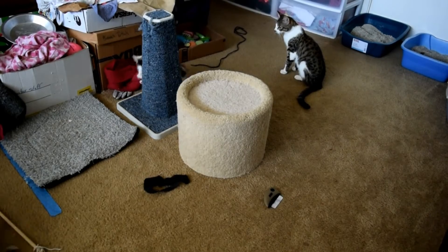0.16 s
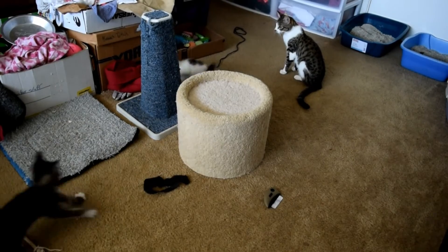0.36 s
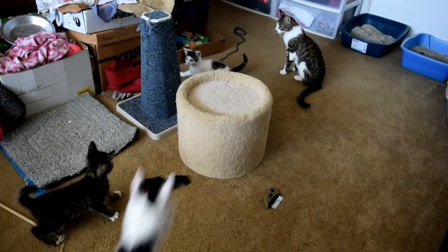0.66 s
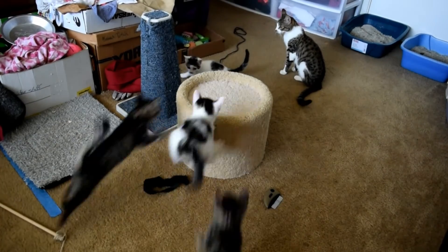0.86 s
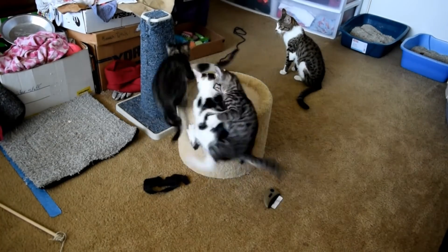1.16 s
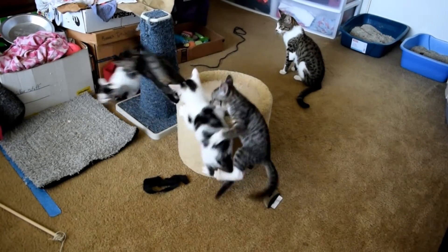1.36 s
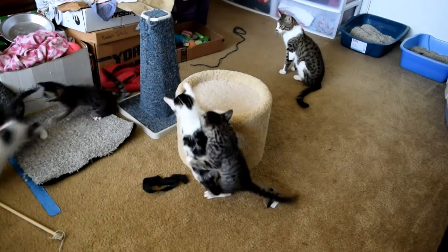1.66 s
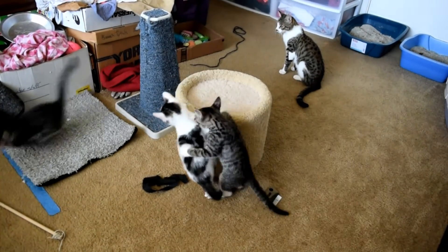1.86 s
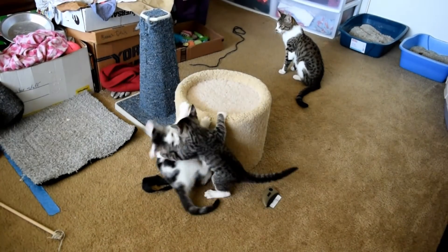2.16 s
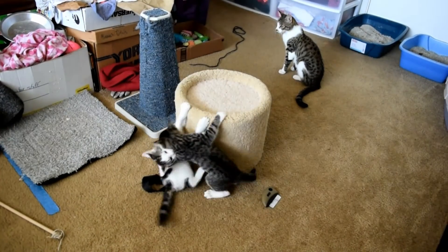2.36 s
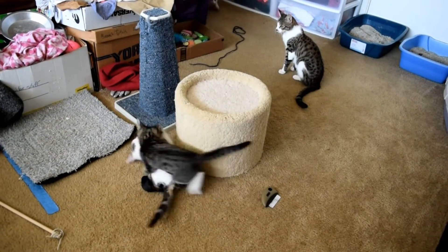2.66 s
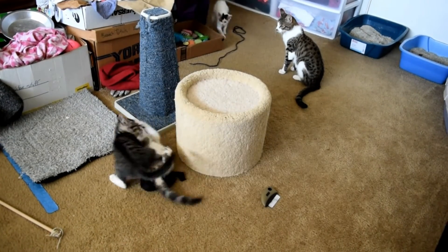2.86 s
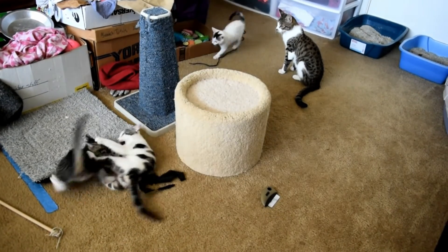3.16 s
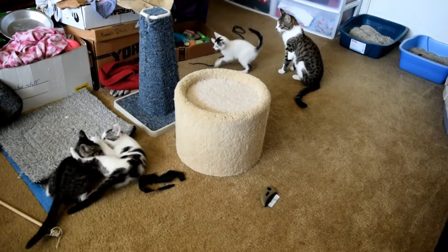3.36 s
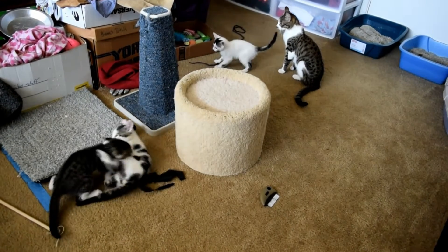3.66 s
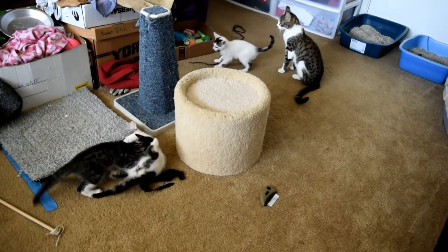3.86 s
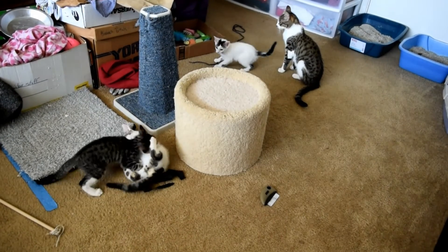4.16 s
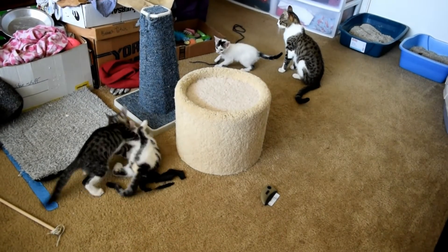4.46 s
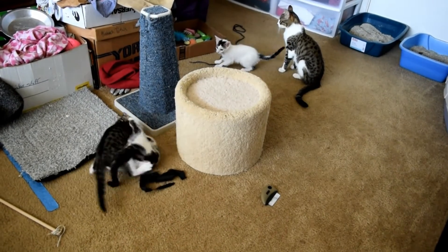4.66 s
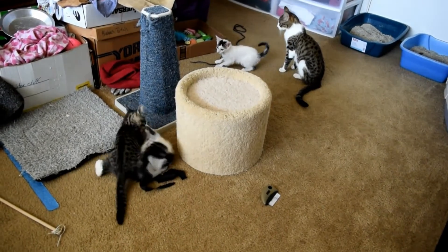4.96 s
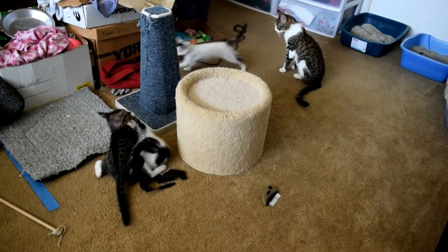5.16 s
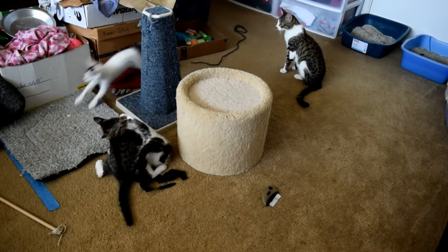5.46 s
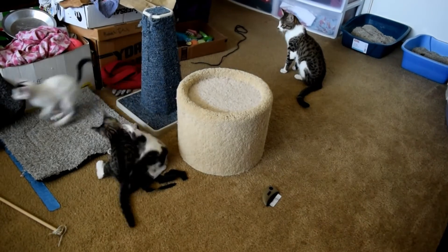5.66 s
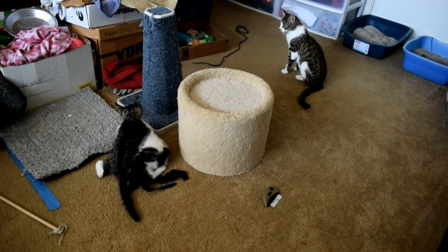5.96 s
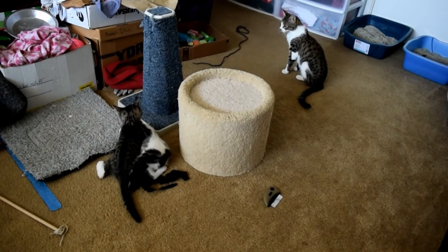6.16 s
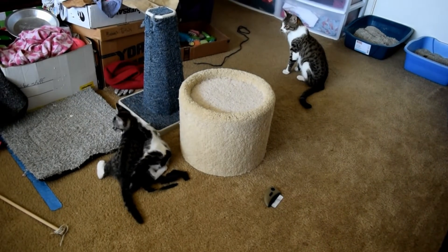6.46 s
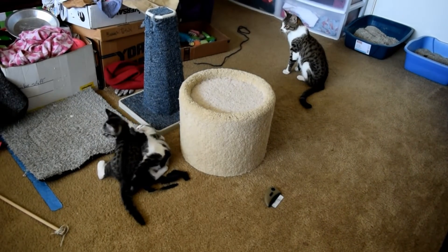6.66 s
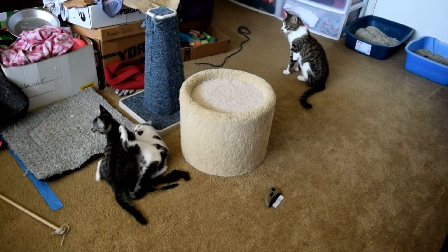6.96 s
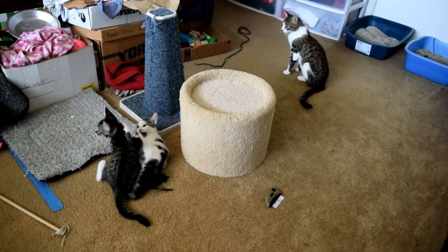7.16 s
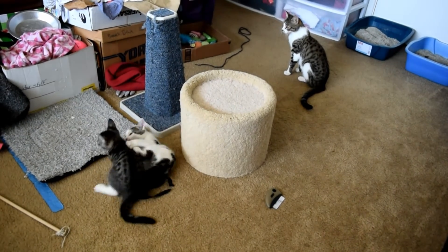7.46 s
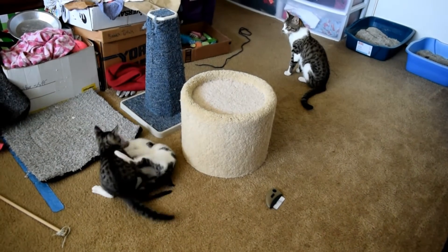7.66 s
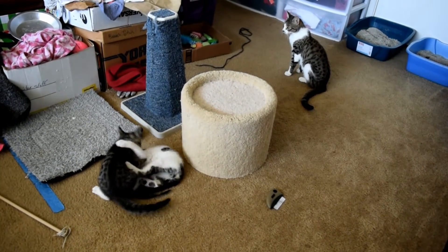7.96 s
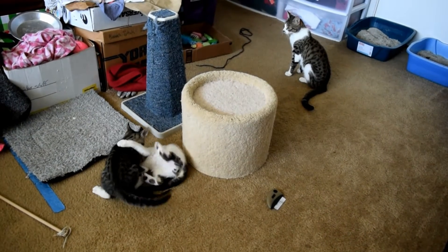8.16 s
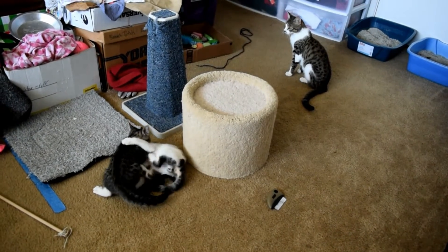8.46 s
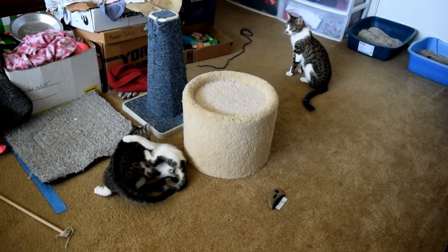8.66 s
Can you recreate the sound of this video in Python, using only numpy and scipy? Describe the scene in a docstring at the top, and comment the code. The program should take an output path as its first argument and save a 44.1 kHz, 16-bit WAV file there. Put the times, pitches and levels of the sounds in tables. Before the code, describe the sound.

In a small furnished room with a faint ventilation hush, kittens run and pounce on carpet. Sharp claw snaps, knocks and a tiny metal jingle come first, then light steps and rubbing fur. A hard hollow knock and scratchy burst hit at three seconds, another thump follows after four, then sparser scuffles. The microphone is a couple of metres away.

```python
"""Kittens chase and wrestle on a carpet in a small furnished room, heard from a couple of metres.
A steady ventilation hush of coloured noise lies under fur and claws rubbing, made of random fibre flicks.
From the start, damped resonances thud on the floor and knock on boxes and cat furniture, and claws snap free
in noise bursts; early on, struck modes of a small metal thing jingle and light steps run.
The hardest knocks come at about 3 s, and a hollow, falling blip of a swept sine at 5.3 s."""
import sys
import numpy as np
from scipy import signal
from scipy.fft import rfft, irfft, next_fast_len
from scipy.io import wavfile
from scipy.ndimage import uniform_filter1d

SR = 44100
rng = np.random.default_rng(int(sys.argv[2]) if len(sys.argv) > 2 else 0)


def inscribe(sig):
    """Save sig as 16-bit PCM at rate SR to the path in sys.argv[1].

    A 1-D sig is mono; a 2-D sig holds one channel per row.
    Samples are clipped to [-1, 1] before scaling.
    """
    pcm = np.round(np.clip(np.atleast_2d(sig).T, -1, 1) * 32767)
    wavfile.write(sys.argv[1], SR, pcm.astype(np.int16))


N = 388521
SIZE = 16384  # samples in one event with its room response
AGE = np.arange(SIZE) / SR  # s since the event began
FREQS = np.fft.rfftfreq(SIZE, 1 / SR)  # Hz
TIME = np.arange(N) / SR  # s


def undb(db):
    """Level: an amplitude gain is ten to the power of its decibels over twenty."""
    return 10 ** (np.asarray(db) / 20)


def unit(x):
    """Normalization: scale a signal to an rms of 1."""
    return x / np.sqrt(np.mean(x ** 2))


def add(track, s, sound, peak_db):
    """Superposition: mix a sound in at time s, its peak taken as twice the rms of its loudest 4 ms."""
    start = int(s * SR)
    peak = 2 * np.sqrt(uniform_filter1d(sound ** 2, size=176).max())
    scaled = sound * undb(peak_db) / peak
    track[start:start + len(sound)] += scaled[:N - start]


def gains(points, freqs):
    """Spectral envelope: gain at each frequency, with dB interpolated over log frequency."""
    hz, db = np.transpose(points)
    return undb(np.interp(np.log(freqs + 1), np.log(hz), db))


def colour(x, points):
    """Linear filtering: shape a long signal by a spectral envelope, then set its rms to 1."""
    size = next_fast_len(N)
    spectrum = rfft(x, size) * gains(points, np.fft.rfftfreq(size, 1 / SR))
    return unit(irfft(spectrum, size)[:N])


def resonance(hz, q):
    """Damped oscillator: low-pass and band-pass responses of a mass on a spring."""
    s, q = 1j * FREQS / hz, max(q, .4)
    low = 1 / (s * s + s / q + 1)
    return low, low * s / q


# Resonances of the room and its furniture. Each row: frequency in Hz, width in Hz,
# relative level in dB.
FURNISHED_ROOM_MODES = [(150, 11, 14), (260.4, 9.5, 14), (348, 8.3, 9), (497, 70, -6), (596, 51, 9),
                        (750, 5.7, 17), (880, 400, 1), (930, 38, -12), (1095, 19, 13), (1344, 120, 12)]
ROOM_RING = sum(undb(db) * resonance(hz, hz / width)[1] for hz, width, db in FURNISHED_ROOM_MODES)


def room(wet_db, t60=.23, gap_s=0.0013, near_db=4, mode_db=0, damp_hz=9000):
    """Reverberation: direct sound, then a flurry off nearby furniture and a dulled tail in the room's modes."""
    late = np.maximum(AGE - gap_s, 0)
    flurry = undb(near_db) * np.exp(-late / .011)
    decay = np.exp(-np.log(1000) * late / t60)  # falls 60 dB in t60 seconds
    tail = rng.standard_normal(SIZE) * (late > 0) * (flurry + decay)
    tail_spectrum = rfft(tail / np.sqrt(np.sum(tail ** 2)))
    modes = 1 + undb(mode_db) * ROOM_RING
    damping = 1 + 1j * FREQS / damp_hz
    return 1 + undb(wet_db) * modes * tail_spectrum / damping


# Colour of the ventilation hush. Each row: frequency in Hz, relative level in dB.
HUSH_COLOUR = [(25, -5), (55, -29), (78, -5), (110, -11), (150, -8), (300, -5.5), (600, -5.5), (950, -0.5),
               (1200, -6), (1500, -4.5), (2500, -10.5), (5000, -17.5), (9000, -25), (15500, -33.5)]


def hush(level_db=-59.5):
    """Stationary broadband noise: the steady air noise of the room."""
    return colour(rng.standard_normal(N), HUSH_COLOUR) * undb(level_db)


# A short blip that swells twice. Each row: time in seconds, pitch in Hz,
# level in dB before the room is added.
BLIP_GLIDE = [(5.322, 1020, -55), (5.324, 975, -32), (5.328, 870, -47), (5.332, 746, -26),
              (5.336, 690, -39), (5.340, 680, -53)]


def blip(wet_db=-8.5, mode_db=-15):
    """Frequency modulation: one nearly pure tone slides down and stops short, with little room."""
    s, hz, db = np.transpose(BLIP_GLIDE)
    phase = 2 * np.pi * np.cumsum(np.interp(TIME, s, hz)) / SR
    swell = np.interp(TIME, s, undb(db), left=0, right=0)
    tone = np.sin(phase) * swell
    return signal.fftconvolve(tone, irfft(room(wet_db, gap_s=.011, mode_db=mode_db)))[:N]


# Modes of the small metal thing. Each row: frequency in Hz, relative level in dB,
# time to decay by 60 dB in seconds.
METAL_MODES = [(3060, 0, .065), (3930, 0, .055), (4860, 0, .05), (5010, -7, .04), (5920, -7, .04),
               (6070, -7, .05), (8250, -8, .03)]
# Shakes of the metal thing. Each row: start in seconds, peak level in dB before the trim,
# pitch struck hardest in Hz, time constant of the rattle in seconds.
METAL_SHAKES = [(0.2637, -35, 3200, 0.0055), (0.2645, -45, 4940, 0.002), (0.513, -41, 4750, 0.016),
                (0.534, -42.5, 4900, .008), (0.536, -40, 5850, 0.009), (0.541, -36, 3930, 0.0041),
                (0.554, -45, 6100, .006)]


def jingles(contact_q=6, grit_db=-21, wet_db=-9, trim_db=-3):
    """Modal excitation: a brief gritty rattle wakes the metal's damped modes, most those near its pitch."""
    out = np.zeros(N)
    ring = 0
    for hz, db, t60 in METAL_MODES:
        q = np.pi * hz * t60 / np.log(1000)
        ring = ring + undb(db) * resonance(hz, q)[1]
    for s, db, hz, rattle_s in METAL_SHAKES:
        grit = rng.standard_normal(SIZE) * np.exp(-AGE / rattle_s)
        rattle = rfft(grit) * resonance(hz, contact_q)[1]
        add(out, s, irfft(rattle * (ring + undb(grit_db)) * room(wet_db)), db + trim_db)
    return out


def walk(rate):
    """Random modulation: levels held for 1 / rate seconds, then slewed; rms 1."""
    size = int(SR / rate)
    held = np.repeat(rng.standard_normal(N // size + 1), size)
    return unit(uniform_filter1d(held, size)[:N])


def fibres(per_s, spread_db, grip_db, grip_rate):
    """Stick-slip friction: fibres flick free one by one, their strength uneven as the grip varies."""
    flicks = (rng.random(N) < per_s / SR) * rng.standard_normal(N)
    sizes_db = spread_db * np.minimum(rng.exponential(size=N), 4)
    return flicks * undb(sizes_db + grip_db * walk(grip_rate))


# Colour of the plucked pile. Each row: frequency in Hz, relative level in dB.
PLUCK_COLOUR = [(150, -10), (800, 0), (2400, 9.5), (4500, -10), (8000, -8.5), (11000, -22), (16000, -35)]


def scratches(hiss, per_s=45, scratch_db=-10, spread_db=3):
    """Impulsive excitation: single loops of pile pluck off the claws, sparse ticks that follow the hiss."""
    sizes_db = spread_db * np.minimum(rng.exponential(size=N), 2)
    plucks = (rng.random(N) < per_s / SR) * undb(sizes_db)
    tear = rng.standard_normal(SIZE) * np.exp(-AGE / 0.0011)
    ticks = colour(signal.fftconvolve(plucks, tear)[:N], PLUCK_COLOUR)
    return undb(scratch_db) * np.sqrt(hiss) * ticks  # hiss is a power


# Quick swipes of a paw through the pile. Each row: start in seconds, length in seconds,
# rub level in dB before the trim, hiss of the claws over the rub in dB.
PAW_SWIPES = [(0.045, 0.024, -52.5, 1.5), (0.078, 0.067, -47.5, -5), (0.3, 0.044, -57, 4.5),
              (0.523, 0.1, -54.5, 2.5), (0.561, 0.083, -48, -23), (1.108, 0.05, -50, -14),
              (1.214, 0.075, -46, -18), (1.345, 0.095, -44, -27), (1.452, 0.17, -52.5, -3),
              (1.686, 0.072, -50.5, -2), (1.917, 0.033, -57, 5.5), (2.18, 0.063, -56, 9),
              (2.405, 0.18, -50, -1), (2.908, 0.08, -46, -2.5), (3.049, 0.097, -49, 2),
              (3.113, 0.14, -36, -7.5), (3.137, 0.04, -40, -1), (3.177, 0.045, -45, 1),
              (3.246, 0.12, -44.5, 1), (3.3, 0.041, -51, -14), (3.387, 0.067, -53, 3),
              (4.073, 0.068, -45.5, -12), (4.409, 0.088, -35.5, -26), (4.516, 0.15, -47, -3.5),
              (6.236, 0.1, -46, -5), (6.261, 0.044, -46.5, 1.5), (8.112, 0.11, -46.5, 0),
              (8.187, 0.1, -51.5, 6.5), (8.245, 0.099, -46, 0.5)]


def swipes(trim_db=-1, rise=0.14, decay=0.35):
    """Transient friction: a swipe starts suddenly and dies away, in shares of its length."""
    for s, length, db, claw_db in PAW_SWIPES:
        age = AGE / max(length, .01)
        onset = np.minimum(age / rise, 1)
        fade = np.exp(-np.maximum(age - rise, 0) / decay)
        yield s, undb(db + trim_db) * onset * fade, claw_db


# Drags and scratching strokes over the carpet. Each row: middle in seconds, half its span in seconds,
# rub level in dB before the trim, hiss over the rub in dB.
SWELLING_STROKES = [(2.33, 0.08, -54, 8.5), (2.673, 0.2, -56.5, 2.5), (2.786, 0.084, -50.5, 2),
                    (3.494, 0.065, -61, -28), (3.793, 0.09, -51.5, -29), (3.963, 0.47, -62.5, 2.5),
                    (4.515, 0.075, -60.5, 2), (4.869, 0.082, -62, 11.5), (5.83, 0.12, -66.5, 4.5),
                    (6.602, 0.058, -56.5, -24), (6.882, 0.027, -51.5, -9), (6.96, 0.11, -53.5, -10.5),
                    (7.082, 0.16, -68, 9), (7.61, 0.1, -53.5, -19), (8.301, 0.032, -45, 4),
                    (8.388, 0.21, -51, 5), (8.42, 0.056, -48.5, 9), (8.542, 0.069, -51.5, 6.5),
                    (8.656, 0.13, -59.5, 7.5)]


def swelling_strokes(trim_db=-1):
    """Sliding friction: a drag or scratching stroke is a rub that swells and sinks smoothly."""
    for s, half_span, db, claw_db in SWELLING_STROKES:
        swell = np.hanning(2 * int(half_span * SR))
        yield s - half_span, undb(db + trim_db) * swell, claw_db


# How hard the kittens tussle. Each row: time in seconds, level of rubbing fur in dB
# before the trim and the fidgeting.
TUSSLE_EFFORT = [(0, -58), (0.35, -55.5), (0.9, -58.5), (1.4, -54), (1.8, -56.5), (2.1, -54.5),
                 (2.55, -57.5), (3.0, -54.5), (3.2, -51), (3.58, -59), (4.1, -55), (4.6, -60), (5.15, -64),
                 (6.05, -58), (6.7, -69), (7.2, -59), (7.9, -75), (8.81, -66)]
# Colours of the rubbing fur and the hissing pile. Each row: frequency in Hz, relative level in dB.
RUB_COLOUR = [(40, -33), (90, -14), (150, -6), (300, -1), (600, 4.5), (800, 4), (960, 7.5), (1200, 4),
              (1500, 4), (1800, 0.5), (2200, -2), (3500, -9.5), (6000, -29), (14000, -54)]
HISS_COLOUR = [(80, -29), (400, -12), (1200, -0.5), (2600, 5), (4000, 2), (5500, -2), (8000, -2.5),
               (10500, -9), (13500, -12.5), (16000, -30)]


def scuffle(tussle_db=-1, fidget_db=1.3, fidget_rate=25, pile_db=-10.5):
    """Friction noise: fur rubs dully and pile hisses, fitfully in the tussle and more with every stroke."""
    effort_db = np.interp(TIME, *np.transpose(TUSSLE_EFFORT)) + tussle_db
    rub = undb(effort_db + fidget_db * walk(fidget_rate)) ** 2  # powers, so that strokes add
    hiss = rub * undb(pile_db) ** 2
    for s, strength, claw_db in [*swipes(), *swelling_strokes()]:
        start = int(s * SR)
        power = strength[:N - start] ** 2
        rub[start:start + len(power)] += power
        hiss[start:start + len(power)] += power * undb(claw_db) ** 2
    fur = colour(fibres(per_s=4000, spread_db=0.5, grip_db=2.5, grip_rate=70), RUB_COLOUR)
    pile = colour(fibres(per_s=9000, spread_db=0.4, grip_db=1.4, grip_rate=110), HISS_COLOUR)
    dull, bright = np.sqrt(rub) * fur, np.sqrt(hiss) * pile
    response = irfft(room(-8.5, t60=0.42, mode_db=-31.0))
    return signal.fftconvolve(dull + bright + scratches(hiss), response)[:N]


# Colour of a claw's snap. Each row: frequency in Hz, relative level in dB.
SNAP_COLOUR = [(100, 3), (500, 16.5), (1300, 7), (2200, 6.5), (3400, 1.5), (4300, -4), (6800, -1),
               (9500, -7), (16000, -6)]
# Claws catching and snapping free. Each row: start in seconds, peak level in dB before the trim,
# pitch in Hz, resonance Q (raised to 0.4 if lower).
CLAW_SNAPS = [(0.1016, -19.5, 4400, 0.86), (0.107, -21.5, 6000, 1.3), (0.1136, -19, 3020, 0.72),
              (0.1275, -25.5, 1800, .5), (0.4432, -37.5, 2920, 1), (1.076, -37, 2780, 0.69),
              (1.291, -32, 2770, 0.32), (1.336, -35, 4000, 0.35), (1.354, -35.5, 5000, 0.5),
              (1.3592, -34.5, 7000, 1.4), (2.1406, -34, 2410, 2.8), (2.188, -39, 3500, 0.94),
              (3.0441, -29, 2440, 1.7), (3.072, -39, 2760, 4), (3.12, -27, 2260, 1),
              (3.137, -23, 3920, 2.6), (3.142, -29.5, 5170, 0.9), (3.177, -28, 2200, 2.1),
              (3.258, -46, 4750, 3.3), (3.282, -29, 1900, 4.8), (3.305, -28, 1790, 7),
              (4.0725, -36, 2420, 2.4), (4.077, -33, 3430, 5.9), (4.4125, -26.5, 2100, 2.4),
              (4.5327, -30.5, 3000, 5.5), (4.557, -34, 3370, 11), (5.353, -46.5, 5000, .8),
              (6.2761, -25.5, 2840, 2.7), (6.278, -33.5, 6700, 2), (6.3775, -44, 3450, 1.4),
              (6.812, -50, 4000, .8), (7.3386, -36, 3080, 2.2), (8.128, -33, 3500, 0.45),
              (8.308, -29.5, 3500, 0.58), (8.565, -42, 5000, .5)]


def snaps(tear_s=0.00065, reach=2.8, wet_db=-2, mode_db=-10, trim_db=-2):
    """Sudden release: a claw tears free in a millisecond or two, its treble reaching a few times its pitch."""
    out = np.zeros(N)
    for s, db, hz, q in CLAW_SNAPS:
        tear = rfft(rng.standard_normal(SIZE) * AGE * np.exp(-AGE / tear_s))
        treble_limit = resonance(reach * hz, np.sqrt(.5))[0]
        tone = resonance(hz, q)[1] * treble_limit * gains(SNAP_COLOUR, FREQS)
        add(out, s, irfft(tear * tone * room(wet_db, mode_db=mode_db)), db + trim_db)
    return out


# Bumps against boxes, posts and toys. Each row: start in seconds, peak level in dB before the trim,
# pitch in Hz, resonance Q, level of the room in dB.
HOLLOW_BUMPS = [(0.114, -32, 620, 1.1, 0), (0.188, -29, 624, 2.3, -1), (0.271, -27, 666, 1.1, -0.5),
                (0.293, -23.5, 710, 0.87, -0.5), (0.310, -21.5, 680, 1.3, -9), (0.439, -27, 766, 1.1, -1.5),
                (0.569, -33.5, 820, 1.1, 5), (1.11, -37, 950, 0.6, -9), (1.214, -41, 860, 1.6, 2),
                (1.292, -31.5, 735, 2, -1), (1.351, -35, 580, 2, -1.5), (1.695, -45, 980, 0.53, 7),
                (1.789, -41, 800, 1.2, -6), (2.012, -37.5, 715, 0.73, -6), (2.024, -37.5, 890, 1, -2.5),
                (2.096, -35.5, 760, 2.5, -9), (3.044, -10.5, 820, 1.34, -3.5), (3.058, -15, 986, 4.4, -3.5),
                (3.136, -32, 900, 3.1, -6), (3.178, -33, 850, 1.5, -12), (3.44, -40, 1110, 1.7, -9),
                (3.475, -38.5, 930, 6.8, -4), (3.505, -43, 1010, 3, 2), (3.537, -40, 970, 3.3, -4),
                (3.617, -39.5, 1050, 2.2, 3), (3.782, -40.5, 1630, 18, -10), (4.0725, -36, 1050, 0.46, -8),
                (4.4125, -26, 970, 3.1, -3.5), (4.422, -22.5, 1080, 0.93, -2), (4.552, -35.5, 960, 0.89, 2),
                (6.241, -39.5, 790, 2.1, 0), (6.497, -47, 1515, 10, 2), (6.592, -49, 1480, 7.8, 1),
                (6.915, -41.5, 970, 5.2, 2), (6.992, -39, 990, 1.5, -5), (7.329, -34, 820, 1.5, -6),
                (7.586, -43, 940, 2.7, 1)]


def knocks(mode_db=-4, trim_db=-1, edge_db=-20, edge_hz=2400, edge_q=3.1, thin_hz=260):
    """Impact on a damped hollow body too small to radiate bass; the stiff contact adds a short, higher clack."""
    out = np.zeros(N)
    edge = undb(edge_db) * resonance(edge_hz, edge_q)[0]
    thin = 1j * FREQS / (thin_hz + 1j * FREQS)  # weak radiation of bass
    for s, db, hz, q, wet_db in HOLLOW_BUMPS:
        low, band = resonance(hz, q)
        add(out, s, irfft(band * (low - edge) * thin * room(wet_db, mode_db=mode_db)), db + trim_db)
    return out


def patter(start_s=0.3, end_s=2.3, step_db=-51, spread_db=2, step_hz=230, spread_octaves=0.37,
           wet_db=-1, count=16):
    """Quasi-periodic impacts: light, uneven running steps in the chase, as rows like the landings."""
    beats, gap = np.linspace(start_s, end_s, count, retstep=True)
    steps = []
    for s, (late, weight, pitch) in zip(beats, rng.standard_normal((count, 3))):
        hz = step_hz * 2 ** (spread_octaves * pitch)
        steps.append((s + gap * np.tanh(late) / 2, step_db + spread_db * weight, hz, wet_db))
    return steps


# Landings of paws and bodies on carpet, from heavy thuds to very faint ones. Each row: start in seconds,
# peak level in dB, pitch in Hz, level of the room in dB.
LANDINGS = [(0.118, -40, 283, -1), (0.19, -33.5, 290, 0), (0.617, -42, 189, 3), (0.645, -36, 273, 0.5),
            (0.697, -45, 181, -1), (0.828, -38.5, 210, 2), (0.947, -47, 170, 2), (1.09, -45, 305, -8),
            (1.181, -44, 282, -2), (1.231, -42, 283, -1), (1.369, -41.5, 254, 3.5), (1.466, -49, 250, 0),
            (1.571, -45.5, 292, -5), (1.614, -45, 280, -7), (1.79, -49, 240, -5), (1.976, -49, 300, 1),
            (2.022, -36, 287, -5), (2.096, -36, 323, 1.5), (2.118, -39, 230, -2), (2.683, -42, 267, 5),
            (2.778, -43, 170, -1.5), (2.886, -48.5, 226, 10), (3.044, -45, 133, 10), (3.395, -51, 200, 3),
            (3.771, -58, 380, 2), (3.839, -48.5, 384, -2), (4.066, -49, 336, -3), (4.412, -27, 368, -1.5),
            (4.424, -34, 140, -5.5), (4.477, -42, 330, 4), (4.542, -34, 356, 3), (4.659, -44.5, 450, 2),
            (4.95, -50, 273, 1), (5.267, -46, 222, -1), (6.239, -36.5, 340, -3), (6.398, -46, 346, -2),
            (6.957, -37.5, 295, -6), (7.281, -35, 354, 0), (8.127, -46, 320, 4), (8.305, -50, 250, 5),
            (8.629, -49, 190, -3)]


def thuds(q=1.63, mode_db=-8):
    """Soft impact: a slow push into the padded floor gives one or two low cycles and no treble."""
    out = np.zeros(N)
    for s, db, hz, wet_db in [*LANDINGS, *patter()]:
        low, band = resonance(hz, q)
        add(out, s, irfft(band * low * room(wet_db, mode_db=mode_db)), db)
    return out


def scene():
    """Superposition: all sources add, and everything reaches both channels alike."""
    mono = hush() + blip() + jingles() + scuffle() + snaps() + knocks() + thuds()
    return np.array([mono, mono])


def record(dry, low_cut_hz=72, top_hz=15600):
    """Band limiting: a high-pass cuts the deep bass and a steep low-pass the top."""
    thin = signal.sosfilt(signal.butter(3, low_cut_hz, "highpass", fs=SR, output="sos"), dry)
    return signal.sosfilt(signal.ellip(8, .2, 70, top_hz, fs=SR, output="sos"), thin)


dry = scene()
out = record(dry)
inscribe(out)
```